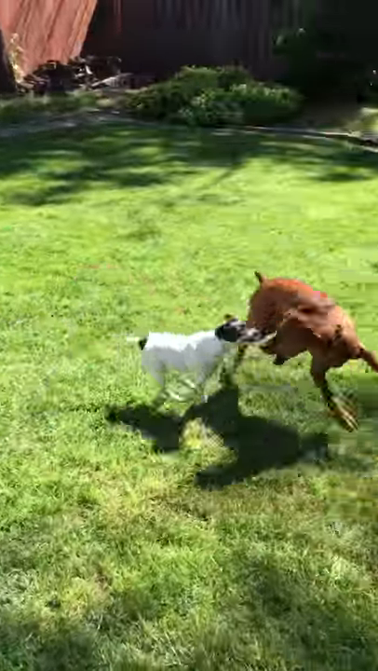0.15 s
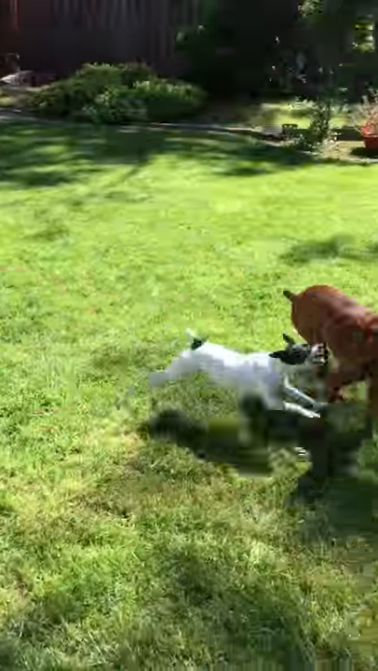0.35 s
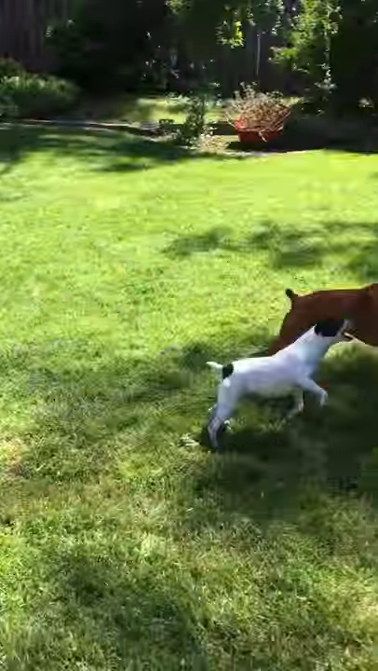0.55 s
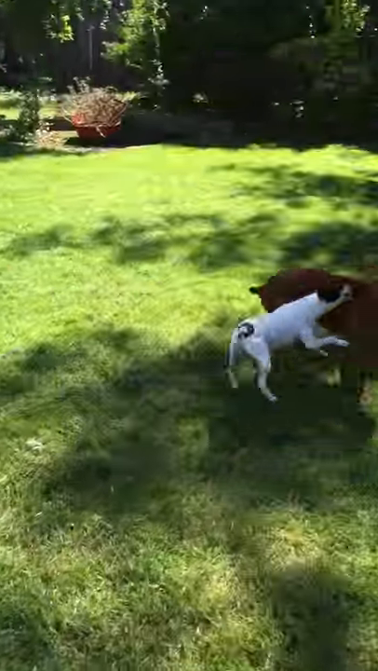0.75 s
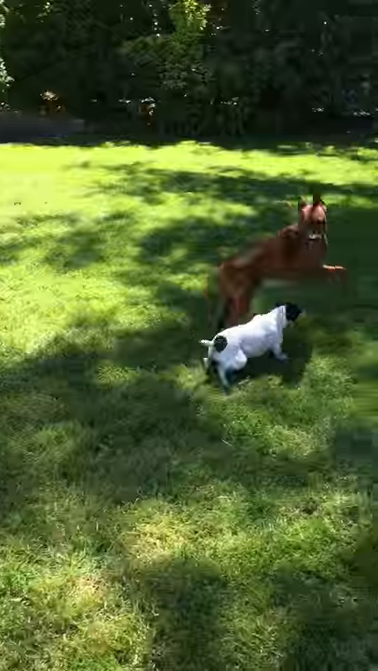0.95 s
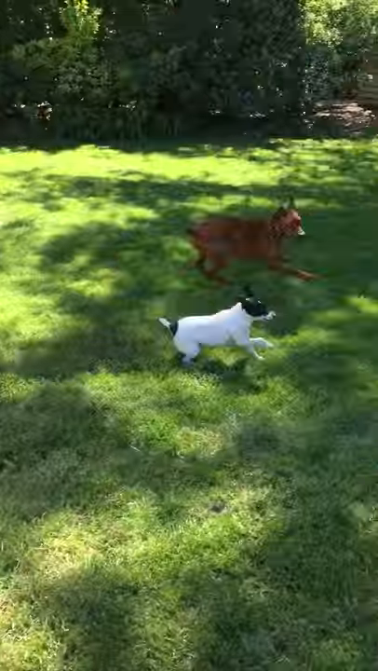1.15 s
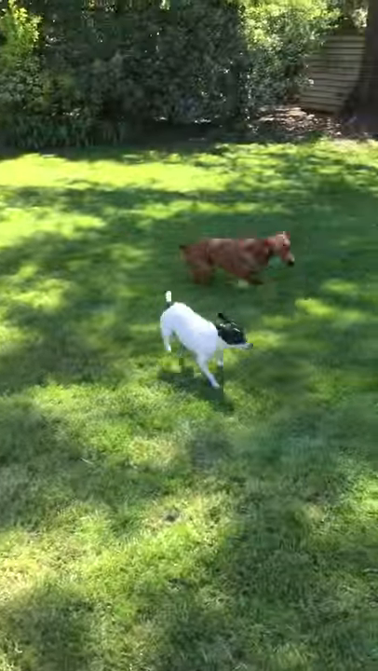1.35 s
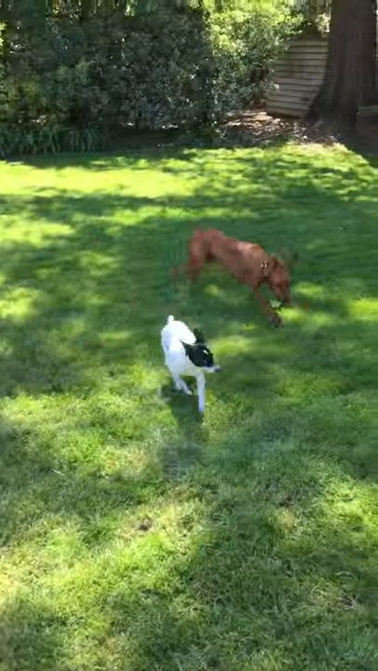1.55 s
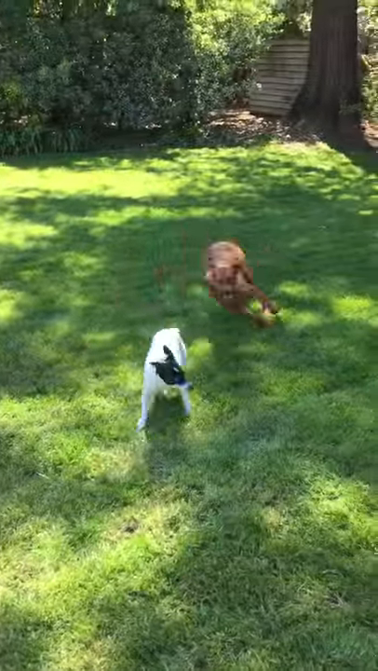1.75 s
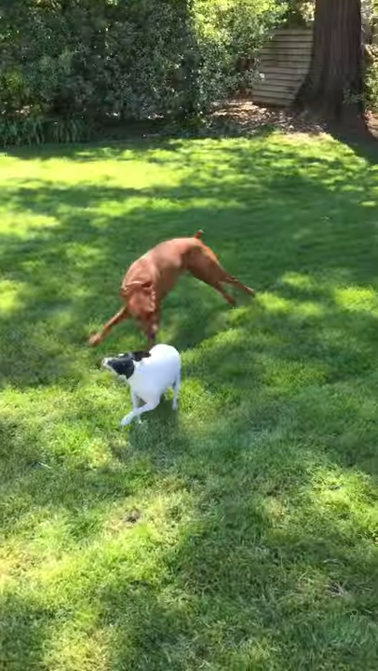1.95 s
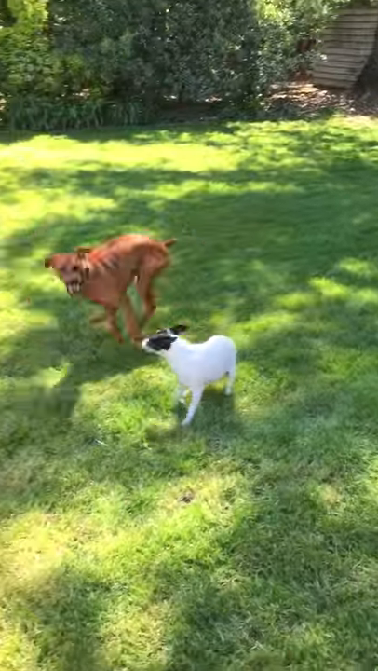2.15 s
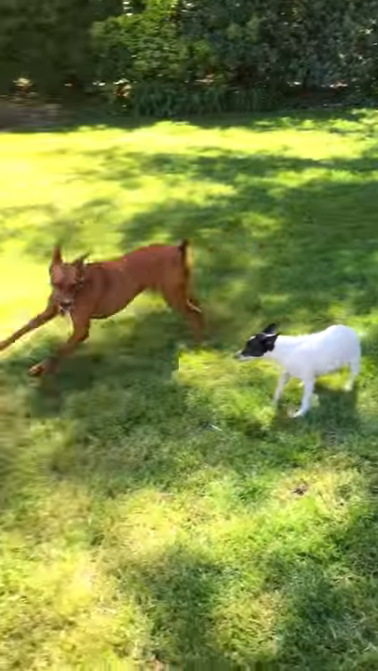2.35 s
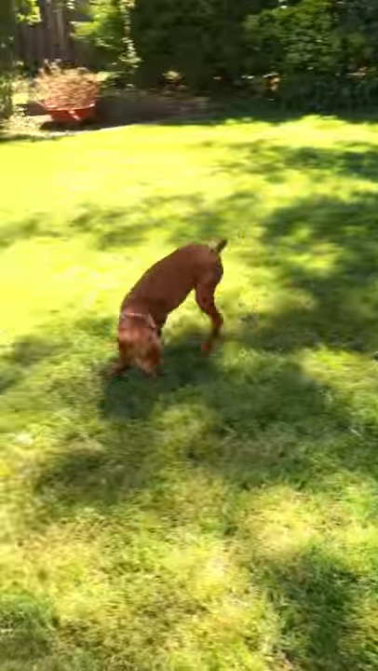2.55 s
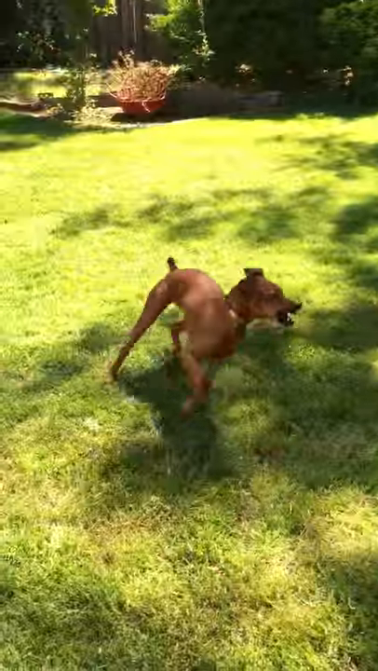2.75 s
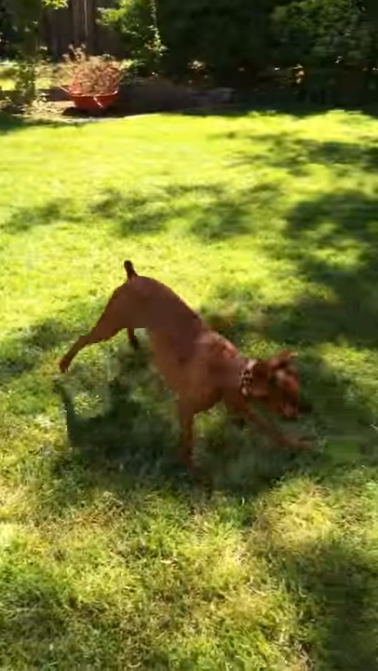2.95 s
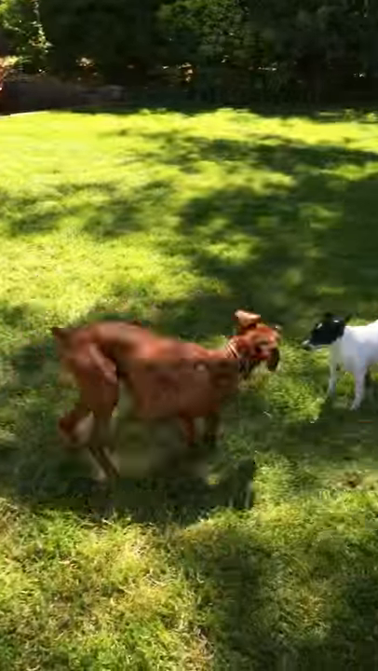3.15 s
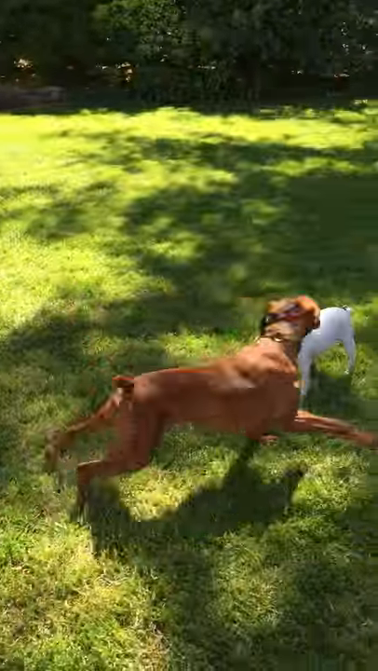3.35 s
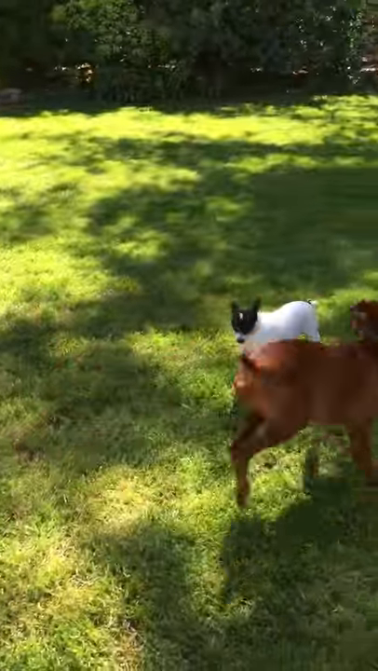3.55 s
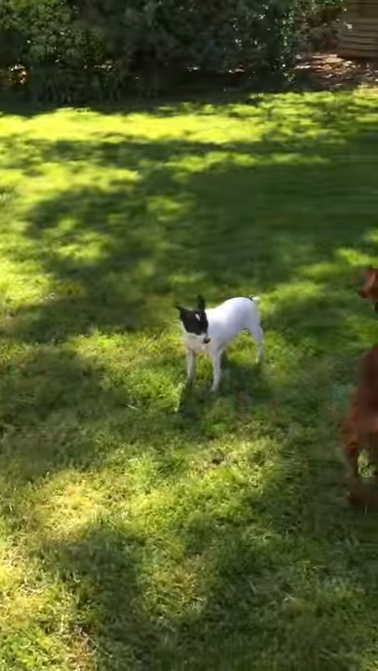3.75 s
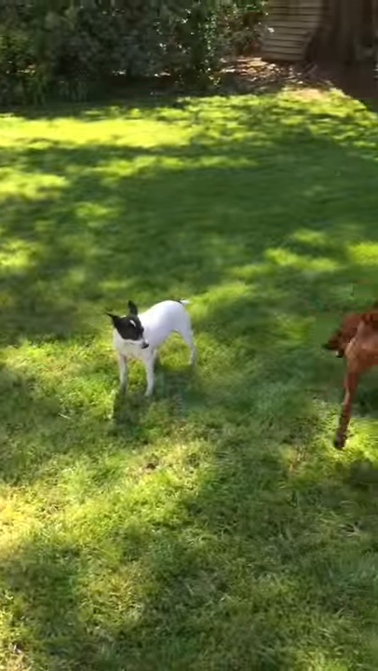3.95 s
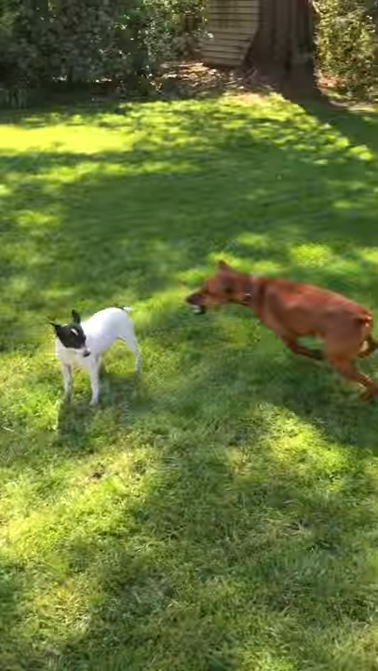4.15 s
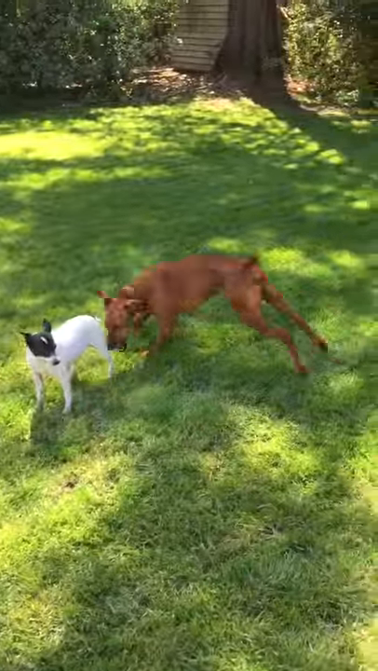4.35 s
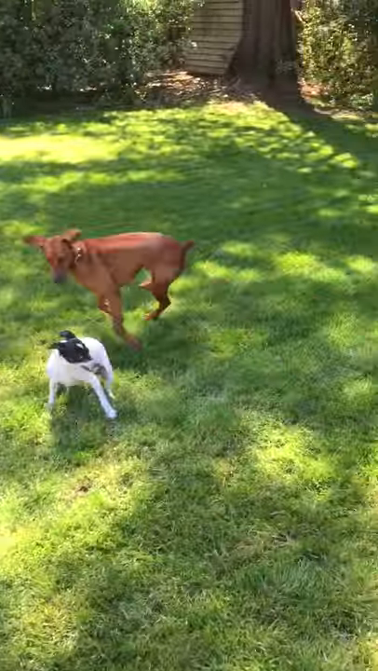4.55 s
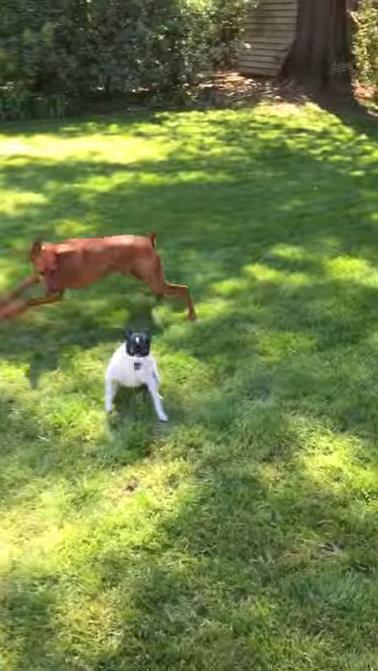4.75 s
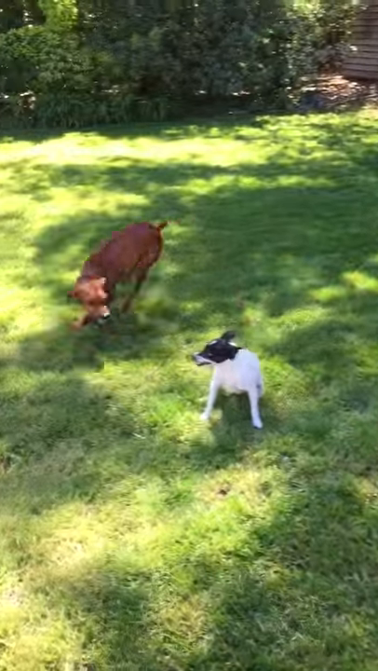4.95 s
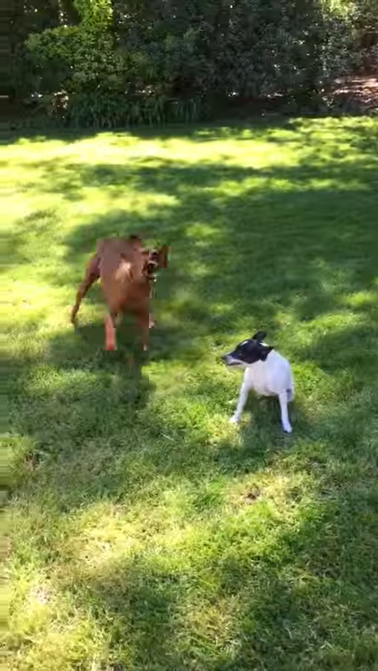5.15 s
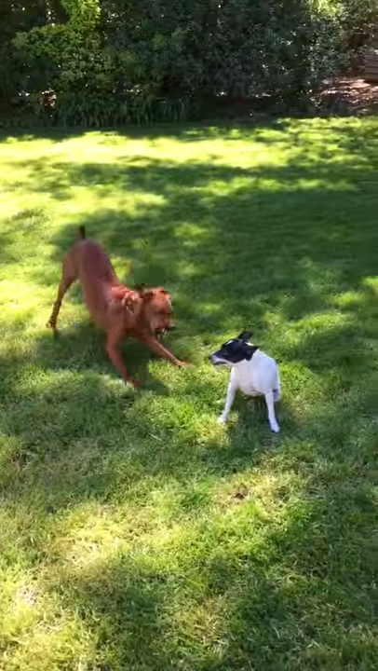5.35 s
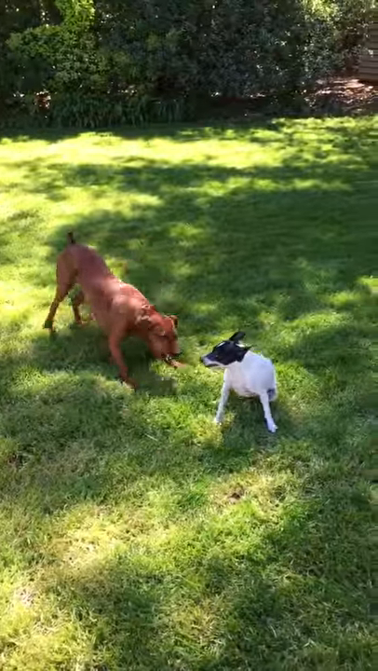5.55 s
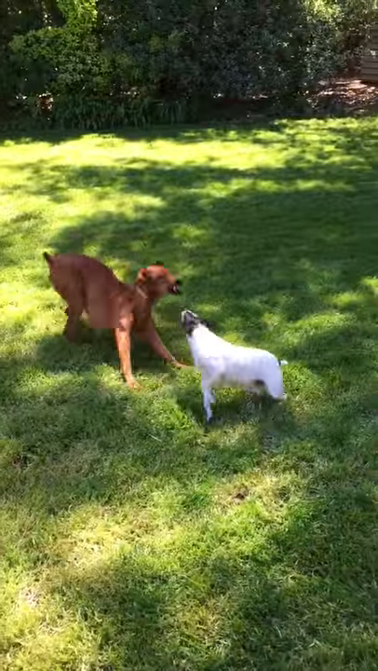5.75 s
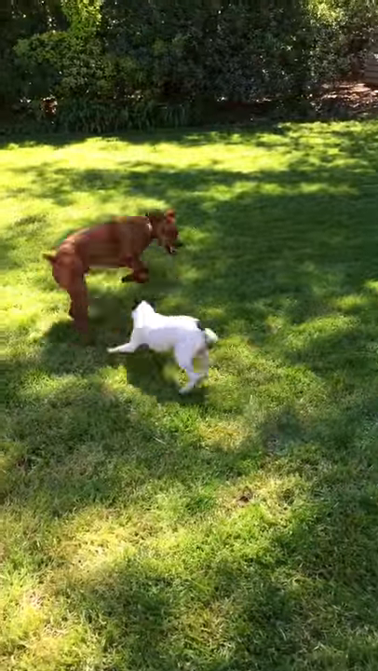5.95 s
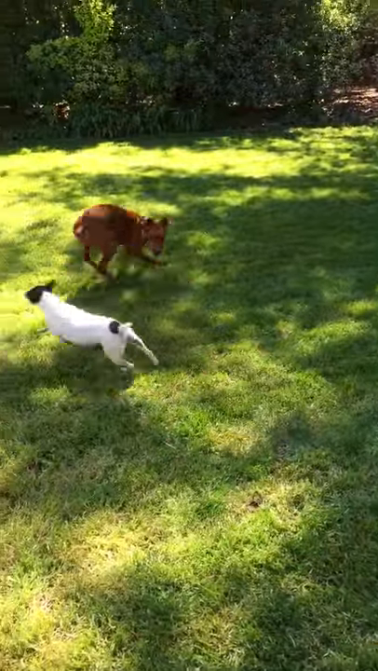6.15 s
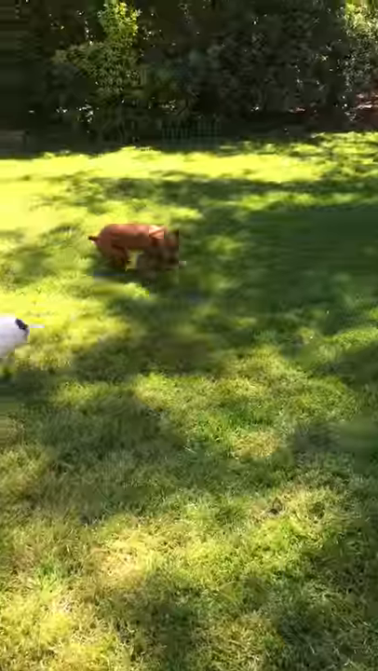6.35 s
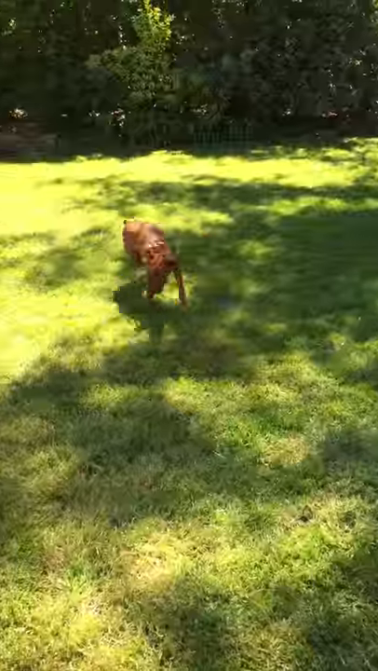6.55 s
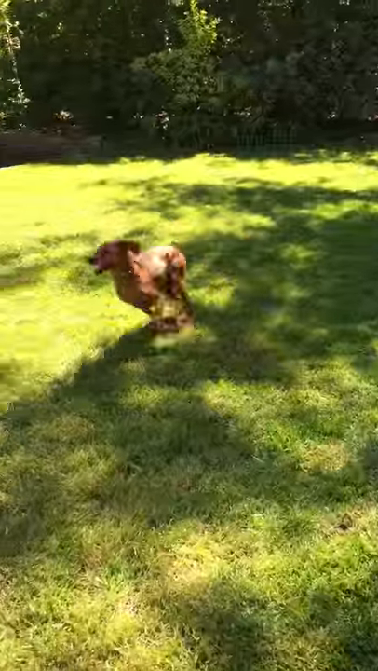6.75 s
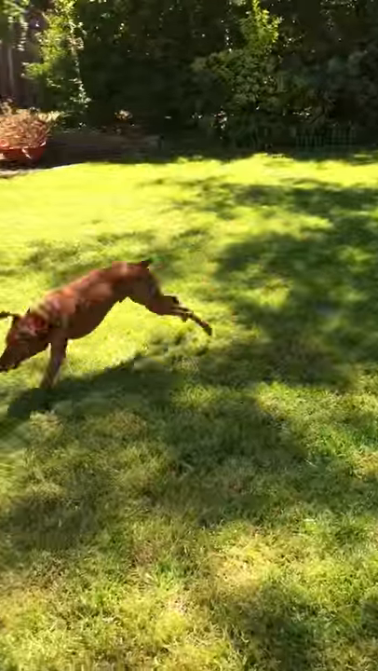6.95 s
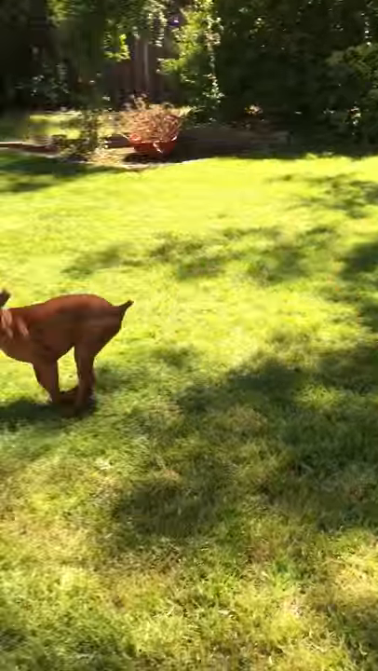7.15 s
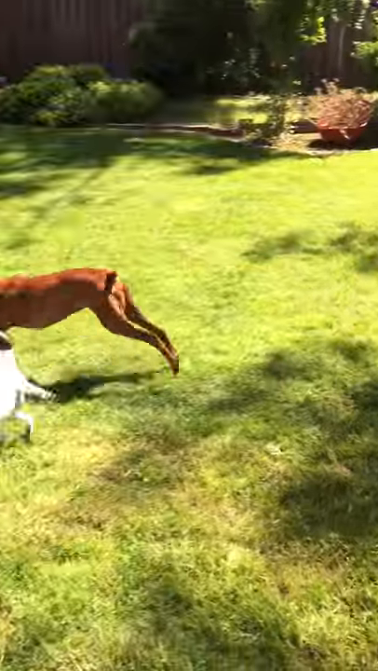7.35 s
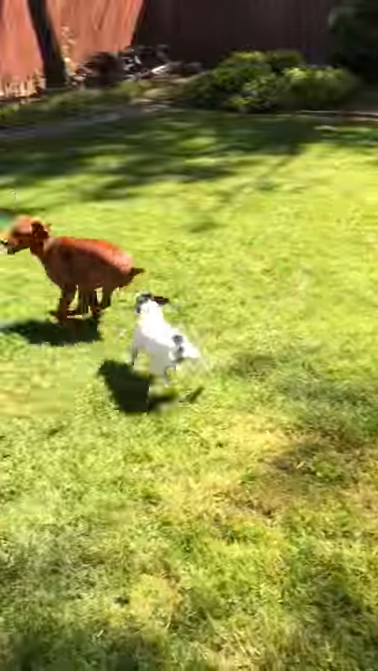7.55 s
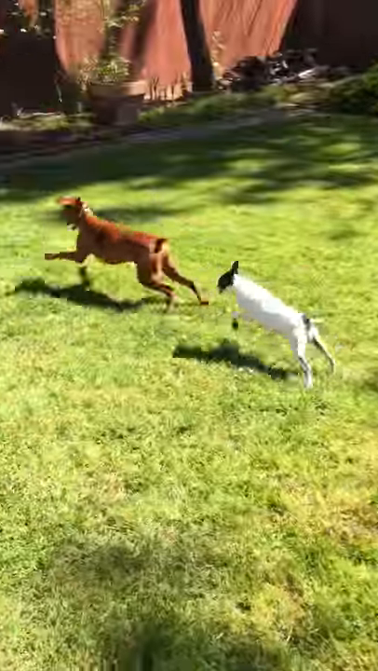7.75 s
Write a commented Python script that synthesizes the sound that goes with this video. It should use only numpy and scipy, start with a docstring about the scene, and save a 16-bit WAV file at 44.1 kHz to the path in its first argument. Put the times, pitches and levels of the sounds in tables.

```python
"""A hoarse growl and snarl open over a low drone of distant traffic, which swells and fades.
Two dogs chase each other over a lawn a few metres away; paws tear at the grass and stalks snap.
One bursts into four loud barks, thrown back by fences and hedges; collar tags clink and wind buffets.
Voices are pulsing folds and noisy breath rung through throat, mouth and teeth; paws are showers of
clicks, as is one rough breath; tags are decaying sines; traffic, air and wind are filtered noise."""
import sys
import numpy as np
from scipy import signal
from scipy.fft import rfft, irfft, next_fast_len
from scipy.io import wavfile

SR = 44100
rng = np.random.default_rng(int(sys.argv[2]) if len(sys.argv) > 2 else 0)


def unload_wav(signal):
    """Save mono or channel-first audio to the path in sys.argv[1] as 16-bit WAV at rate SR, clipped to [-1, 1]."""
    wavfile.write(
        sys.argv[1],
        SR,
        np.round(np.clip(np.atleast_2d(signal).T, -1, 1) * 32767).astype(np.int16),
    )


N = 343980
TIME = np.arange(N) / SR


def amp(db):
    """Decibels to gain."""
    return 10 ** (np.asarray(db) / 20)


def unit(x):
    """Scales to rms 1."""
    return x / np.sqrt(np.mean(abs(x) ** 2) + 1e-20)


def read(points, hz):
    """Reads a table on a log-frequency axis."""
    f, value = np.transpose(points)
    return np.interp(np.log(hz + 1), np.log(f + 1), value)


def add(mix, s, sound):
    """Mixes a sound in at time s."""
    part = mix[max(round(s * SR), 0):][:len(sound)]
    part += sound[:len(part)]


def colour(x, points):
    """Filters by a table of (frequency [Hz], gain [dB])."""
    size = next_fast_len(len(x) + 2048)
    gain = amp(read(points, np.fft.rfftfreq(size, 1 / SR)))
    return irfft(rfft(x, size) * gain, size)[:len(x)]


def wander(count, rate_hz):
    """Smooth random drift of about rms 1, fading out above the rate; repeats after one second."""
    z = rfft(rng.standard_normal(SR))
    smooth = z / (1 + (np.arange(len(z)) / rate_hz) ** 4)
    return np.resize(unit(irfft(smooth, SR)), count)


def resonate(x, hz, width_hz):
    """A moving resonance: shift hz down to zero, smooth twice, shift back."""
    turn = np.exp(2j * np.pi * np.cumsum(hz) / SR)
    r = np.exp(-np.pi * width_hz / SR)
    smooth = signal.lfilter([(1 - r) ** 2], [1, -2 * r, r * r], x / turn)
    return 2 * (turn * smooth).real


def held(x, db, size=700):
    """Makes a sound follow a level curve, with soft ends."""
    window = np.hanning(size)
    power = signal.fftconvolve(x * x, window / window.sum(), "same")
    ends = signal.windows.tukey(len(x), min(2 * size / len(x), 1))
    return amp(db) * ends * x / np.sqrt(abs(power) + 1e-12)


def progress(length):
    """Runs from 0 to 1 over a sound of this length, never under 800 samples."""
    return np.linspace(0, 1, max(round(length * SR), 800))


# distant traffic: (time [s], rumble level [dB], moan level [dB])
TRAFFIC_LEVELS = [(0, -41.5, -57), (1.6, -41.5, -47.5), (2.4, -40.5, -43.5), (3.1, -43.5, -48),
                  (3.798, -41, -42.5), (4.696, -38, -37.5), (5.6, -40, -39.5), (6.199, -38, -36),
                  (6.702, -40.5, -39), (7.101, -38, -46.5), (7.8, -33.5, -40)]
# tone of the engine rumble: (frequency [Hz], gain [dB])
RUMBLE_TONE = [(20, -50), (35, -32), (55, -9.5), (85, -6.5), (120, 0.5), (175, 1.5), (240, -6),
               (400, -28.5), (480, -14), (600, -24), (800, -24), (1500, -34.5), (3000, -44.5),
               (6000, -49.5)]
# tone of the open air: (frequency [Hz], gain [dB])
AIR_TONE = [(100, 0.5), (1000, 10.5), (2000, -8), (4000, -8.5), (9000, -8), (17000, -21.5)]


def background(moan_hz=325, moan_width_hz=120, air_db=-66.5):
    """Far engines rumble and moan over the faint hiss of open air."""
    s, *columns = np.transpose(TRAFFIC_LEVELS)
    rumble_db, moan_db = (np.interp(TIME, s, c) for c in columns)
    low, mid, high = rng.standard_normal((3, N))
    rumble = amp(rumble_db) * unit(colour(low, RUMBLE_TONE))
    moan = resonate(mid, np.full(N, moan_hz), moan_width_hz)
    moan += amp(-11.5) * resonate(mid, np.full(N, 520), 93)
    air = amp(air_db) * unit(colour(high, AIR_TONE))
    return rumble + amp(moan_db) * unit(moan) + air


# wind brushing the microphone: (time [s], level [dB])
WIND_LEVELS = [(0, -67), (6.5, -58), (6.8, -44), (7.15, -43), (7.35, -69), (7.8, -57)]


def wind():
    """Soft low buffeting: bass-heavy noise whose level rises and falls."""
    level_db = np.interp(TIME, *np.transpose(WIND_LEVELS))
    buffeting = colour(rng.standard_normal(N), [(20, -21), (50, -1.5), (90, 2.5), (200, -15), (800, -61)])
    return amp(level_db) * unit(buffeting)


# growls, each one push of the voice:
# (start [s], length [s], top pitch before jitter [Hz], top level before the trim [dB])
GROWL_PUSHES = [(0, 0.17, 152.4, -38.5), (.17, 0.1, 204.4, -32), (.44, 0.066, 156, -36),
                (.505, 0.1, 209.3, -28.5), (.66, 0.092, 171, -31), (.77, 0.073, 177.5, -27.5),
                (.81, 0.12, 216, -28), (1.12, 0.031, 171.4, -33.5), (1.145, .025, 168, -30),
                (1.345, 0.029, 165, -26), (1.385, 0.05, 202, -31), (1.85, 0.11, 179.8, -30.5),
                (3.465, 0.077, 165, -30.5), (4.005, 0.083, 151.5, -28), (4.06, .1, 184.4, -26),
                (4.15, 0.085, 174, -27.5), (4.92, 0.093, 185.3, -29), (5.01, .08, 184.7, -24.5),
                (5.08, 0.097, 185, -29.5), (5.795, 0.052, 180, -21.5), (5.88, 0.039, 170.7, -27),
                (7.235, 0.088, 200.7, -35), (7.35, 0.19, 212.4, -27.5), (7.51, 0.13, 159.7, -33),
                (7.63, 0.065, 198, -36)]
GROWL_SLACK_HZ, GROWL_FADE_DB = 147.7, -8.5  # pitch, and level against the top, at both ends of a push


def growl(start, length, top_hz, db, jitter=0.065, shimmer=0.51, fall_db=-11, trim_db=-1.5):
    """Slack folds flap unevenly behind a nearly shut mouth, mostly at the fundamental, in one push."""
    push = np.sin(np.pi * progress(length))
    hz = GROWL_SLACK_HZ + (top_hz - GROWL_SLACK_HZ) * push
    phase = 2 * np.pi * np.cumsum(hz * (1 + jitter * wander(len(hz), 96))) / SR
    folds = sum(amp(fall_db * np.log2(k)) * np.cos(k * phase) for k in range(1, 6))  # fall per octave
    voice = held(folds, db + trim_db + GROWL_FADE_DB * (1 - push))
    return start, voice * unit(1 + shimmer * wander(len(hz), 45))


# snarls: (start [s], length [s], mouth resonance at first [Hz], at last [Hz], lip resonance [Hz],
#  throat, rasp and hiss levels before their trims [dB], swell from start to end [dB]);
# start and length run between the midpoints of attack and release
SNARL_BREATHS = [(0, 0.019, 1420, 1450, 2800, -43, -44, -58, -19),
                 (0.144, .13, 1650, 1720, 2780, -42, -52, -59, 7),
                 (0.419, 0.16, 1380, 1250, 2064, -36.5, -37, -53.5, 2.5),
                 (0.571, 0.18, 1600, 1850, 2150, -36, -38, -49, 0),
                 (.76, 0.21, 1400, 1520, 2060, -33.5, -34, -41, 12.5),
                 (0.988, 0.046, 1480, 1510, 2530, -44, -39.5, -49, -12),
                 (1.099, 0.18, 1540, 1560, 2470, -42, -50.5, -64.5, -6),
                 (1.339, 0.1, 1360, 1460, 3160, -45, -37, -48, 8),
                 (1.446, 0.082, 1460, 1480, 2460, -58, -45, -62, 1),
                 (1.663, 0.04, 1700, 1715, 2770, -48, -48, -59, 22),
                 (1.82, 0.18, 1650, 1600, 2650, -41, -38.5, -48, 23),
                 (2.09, .14, 1520, 1300, 1970, -44.5, -36.5, -55, -4.5),
                 (2.343, 0.066, 1390, 1390, 2200, -49, -44.5, -57.5, 0.5),
                 (3.336, 0.16, 1520, 1270, 2410, -33, -37.5, -65, 10),
                 (3.495, .17, 1520, 1430, 2380, -45.5, -42.5, -85, -11.5),
                 (4.02, 0.16, 2030, 2250, 2880, -52, -44.5, -60.5, -3.5),
                 (4.111, .11, 1750, 1420, 2770, -48.5, -46.5, -58.5, 0),
                 (4.411, 0.086, 1850, 1850, 2320, -56, -38.5, -55, 7.5),
                 (4.899, 0.12, 1180, 1250, 2000, -40, -43, -57.5, 1),
                 (4.96, 0.12, 1775, 2150, 2910, -32, -36, -46.5, -0.5),
                 (5.069, 0.16, 1890, 1310, 2310, -32.5, -39.5, -50, 3),
                 (5.786, 0.11, 1280, 1190, 1980, -31, -30, -45, 12),
                 (5.909, .14, 1420, 1600, 2460, -42.5, -41.5, -52.5, -7),
                 (6.781, 0.093, 1470, 1500, 2520, -47, -48, -60.5, -10),
                 (7.211, 0.082, 2380, 1950, 2750, -37, -33, -51, 8),
                 (7.302, 0.15, 1740, 1640, 2430, -41, -38.5, -49.5, 2),
                 (7.389, .13, 1400, 1250, 2250, -36, -33.5, -49.5, 6),
                 (7.519, 0.071, 1800, 1800, 2160, -41, -42.5, -54, 5),
                 (7.584, 0.11, 1290, 1210, 2040, -66, -36.5, -58, -10)]
# tone of the snarling throat: (frequency [Hz], gain [dB])
SNARL_THROAT_TONE = [(140, -20), (250, 6), (340, -8), (480, -3), (640, 1), (780, -6.5), (1000, -5),
                     (1400, -16), (3000, -72)]
# tone of the breath between the teeth: (frequency [Hz], gain [dB])
SNARL_HISS_TONE = [(3000, -18.5), (4700, -16), (5400, 3), (6300, -0.5), (6800, 2), (7400, -9), (8600, -3.5),
                   (10500, -9.5), (12200, -10), (13500, -20), (17000, -14)]
SNARL_ATTACK_S, SNARL_RELEASE_S = .018, .05  # each straddles its end of the snarl
LIP_FOLLOW, WHISTLE_FOLLOW = 0.17, 0.3  # how far the upper resonances move with the mouth's


def snarl(start, length, first_hz, last_hz, lip_hz, throat_db, rasp_db, hiss_db, swell_db,
          flap_hz=85, rattle_db=1.5, mouth_width_hz=240, lip_width_hz=330, lip_db=-3,
          nose_hz=3500, nose_db=-13, wash_db=-10, whistle_hz=5900, whistle_db=-3, high_bands_db=-9,
          throat_trim_db=-3.5, rasp_trim_db=-1.8, hiss_trim_db=-3):
    """Air rattles through the throat, rings in the gliding mouth and lips, and hisses between the teeth."""
    whole = length + (SNARL_ATTACK_S + SNARL_RELEASE_S) / 2
    u = progress(whole)
    count = len(u)
    ramps = np.minimum(u / SNARL_ATTACK_S, (1 - u) / SNARL_RELEASE_S) * whole
    envelope = np.clip(ramps, 0, 1) * amp(swell_db * (u - .5))
    mouth_hz = first_hz * (last_hz / first_hz) ** u
    opening = mouth_hz / mouth_hz.mean()
    # loose tissue slaps at uneven intervals
    flaps = np.cumsum(flap_hz * np.exp(.5 * wander(count, 44))) / SR
    slaps = .6 + np.exp(-(flaps % 1) / .3)
    rattle = unit(slaps * amp(rattle_db * wander(count, 40)))
    # the shaking head bends all ringing resonances together
    jaw = 1 + .028 * wander(count, 14)

    def ring(hz, width_hz):
        """Breath in one resonance."""
        return unit(resonate(rng.standard_normal(count), hz * jaw, width_hz))

    throat = colour(rng.standard_normal(count), SNARL_THROAT_TONE)
    wash = colour(rng.standard_normal(count),
                  [(500, -25), (900, -9.5), (2800, 3.5), (3300, -19), (4200, -18), (5000, -29)])
    rasp = ring(mouth_hz, mouth_width_hz)
    rasp += amp(lip_db) * ring(lip_hz * opening ** LIP_FOLLOW, lip_width_hz)
    rasp += amp(nose_db) * ring(nose_hz, 700) + amp(wash_db) * unit(wash)
    hiss = unit(colour(rng.standard_normal(count), SNARL_HISS_TONE))
    hiss += amp(whistle_db) * ring(whistle_hz * opening ** WHISTLE_FOLLOW, 610)
    for band_hz in (8400, 12000):  # two narrow bands of hiss, each with a slow drift of its own
        hiss += amp(high_bands_db) * ring(band_hz * (1 + .05 * wander(count, 10)), 600)
    voice = rattle * amp(throat_db + throat_trim_db) * unit(throat)
    voice += rattle * amp(rasp_db + rasp_trim_db) * unit(rasp)
    voice += np.sqrt(rattle) * amp(hiss_db + hiss_trim_db) * unit(hiss)  # hiss rattles less
    return start - SNARL_ATTACK_S / 2, envelope * voice


# squeaks of the voice, and one faint distant whistle (at 3.74 s):
# (start [s], length [s], pitch at first [Hz], at last [Hz], level before the trim [dB])
SQUEAK_GLIDES = [(0, 0.057, 286, 273, -37.5), (.06, 0.093, 288, 339, -38.5),
                 (0.126, 0.071, 330.5, 294, -38.5), (.17, 0.061, 323, 410, -42),
                 (.505, 0.048, 830, 930, -36), (.525, 0.039, 1133, 1370, -30),
                 (3.505, 0.031, 1618, 1644, -28), (3.74, 0.26, 1866, 1854, -67),
                 (5.86, 0.052, 1143, 1076, -28), (7.405, 0.064, 1065, 1134, -28.5),
                 (7.47, 0.041, 1250, 1286, -38)]


def squeak(start, length, first_hz, last_hz, db, jitter=.03, shimmer=0.21, overtone_db=-17, trim_db=-2):
    """An unsteady whistle, as from the tight edge of the folds: a short soft-ended glide and its octave."""
    u = progress(length)
    hz = (first_hz + (last_hz - first_hz) * u) * (1 + jitter * wander(len(u), 160))
    phase = 2 * np.pi * np.cumsum(hz) / SR
    whistle = held(np.sin(phase) + amp(overtone_db) * np.sin(2 * phase), db + trim_db)
    return start, whistle * unit(1 + shimmer * wander(len(u), 135))


# the faint swish of running through grass: (start [s], end [s], level [dB])
GRASS_SWISHES = [(0, 1.268, -59.5), (1.546, 1.85, -96), (3.336, 3.622, -64.5), (5.814, 6.146, -63),
                 (6.754, 7.798, -68.5)]


def swish(start, end, db, stride_hz=14, uneven_db=5):
    """Legs brush the grass in uneven strokes."""
    count = len(progress(end - start))
    blades = colour(rng.standard_normal(count), [(1000, 3), (3000, 1), (5000, -14), (9000, -3), (17000, -3)])
    strokes = amp(uneven_db * wander(count, stride_hz)) * signal.windows.tukey(count, .2)
    return start, amp(db) * unit(blades * strokes)


# paws scuffing the grass, and one rough breath after the last bark (at 5.452 s):
# (time of the peak [s], level before the trim [dB], rise to the peak [s], centre of the crunch [Hz])
SCUFFS_AND_BREATH = [(0.092, -51.5, 0.033, 3550), (0.329, -48, 0.028, 3350), (0.379, -50, 0.048, 3700),
                     (0.91, -25, 0.027, 2885), (0.941, -26.5, 0.037, 1980), (1.379, -32, 0.037, 3100),
                     (2.529, -49, 0.043, 9500), (2.59, -30.5, 0.034, 2180), (3.767, -52, 0.023, 6200),
                     (3.864, -48, 0.028, 9030), (5.452, -42, 0.056, 2540), (6.344, -53.5, 0.06, 2400),
                     (6.389, -27, 0.035, 2800), (6.459, -37.5, 0.04, 4180), (6.49, -37.5, 0.024, 4060),
                     (6.576, -53.5, 0.03, 3700), (6.829, -39, 0.033, 1070), (6.951, -43, 0.031, 886),
                     (7.093, -46, 0.032, 1010), (7.126, -40.5, 0.036, 2200), (7.224, -31, 0.023, 3650),
                     (7.269, -35, 0.054, 2200), (7.45, -33.5, 0.042, 3600), (7.604, -33.5, 0.063, 2910),
                     (7.655, -34, 0.029, 2000)]
# tone of tearing grass: (frequency [Hz], gain [dB])
GRASS_TONE = [(290, -32.5), (500, -6), (850, -7), (1450, 0.5), (1910, 1.5), (2090, -1.5), (3030, -3),
              (5220, -8.5), (5710, -11), (9010, -16), (17000, -28.5)]


def scuff(s, db, length, hz, blades_per_s=5000, spread_db=0.0, crunch=0.48, trim_db=-5):
    """A paw rips through many blades, each a tiny click; the rough breath is the same shower of clicks."""
    u = np.arange(round(4 * length * SR)) / (length * SR)
    clicks = rng.standard_normal(len(u)) * (rng.random(len(u)) < blades_per_s / SR)
    clicks *= amp(spread_db * np.minimum(rng.exponential(1, len(u)), 3))
    tearing = unit(colour(clicks, GRASS_TONE))
    tearing += crunch * unit(resonate(clicks, np.full(len(u), hz), 0.28 * hz))
    stroke = u ** 4 * np.exp(4 - 4 * u)  # peaks after one length
    return s - length, amp(db + trim_db) * stroke * unit(tearing)


# blades and twigs snapping: (time [s], level before trim and decay [dB])
STALK_SNAPS = [(0.2038, -31), (0.3864, -39), (0.4787, -31.5), (1.054, -42), (1.1504, -34), (1.2034, -57),
               (1.3412, -33), (1.6965, -44), (1.746, -43), (1.896, -37), (4.6817, -40.5), (4.716, -39.5),
               (4.798, -39), (5.7692, -31), (5.868, -35), (6.954, -35), (7.0, -37)]


def snap(s, db, decay_s=0.0037, trim_db=-7):
    """One dry stalk breaks: a noise crack that dies away at once."""
    t = np.arange(1024) / SR
    crack = colour(rng.standard_normal(len(t)), [(400, 10), (1500, -4.5), (5000, -10), (16000, -10)])
    return s, amp(db + trim_db) * unit(crack) * np.exp(-t / decay_s)


# single pops of the throat and jaws:
# (time [s], level before trim and decay [dB], mouth resonance [Hz])
THROAT_POPS = [(.421, -29, 1730), (0.46, -25, 1390), (1.099, -29, 1515), (1.122, -25.5, 1520),
               (1.15, -30, 1570), (1.205, -41, 1570), (1.235, -39, 1610), (1.345, -39, 1400),
               (1.364, -22, 1340), (3.334, -37.5, 1550), (3.45, -16.5, 1250), (4.679, -30.5, 1406),
               (5.788, -26, 1300), (6.78, -43, 1490), (7.216, -23, 2310)]


def pop(s, db, hz, decay_s=0.0076, trim_db=-7):
    """One slap of wet tissue rings the throat, mouth and lips."""
    t = TIME[:2048]
    puff = rng.standard_normal(len(t))
    voice = np.zeros(len(t))
    for ratio, mode_db in [(.43, -14), (1, 4), (1.6, -9.5), (2.2, -16)]:  # against the mouth resonance
        voice += amp(mode_db) * unit(resonate(puff, np.full(len(t), ratio * hz), 316))
    return s, amp(db + trim_db) * unit(voice) * np.exp(-t / decay_s)


# barks, each an arch of pitch; the first turns clearer midway, the others break into roughness:
# (start [s], rise [s], fall [s], time to the turn [s], top pitch before jitter [Hz],
#  roughness before the turn [0-1], after it [0-1], mouth resonance at first [Hz], at last [Hz],
#  throat, mouth and teeth levels after the turn, before fading [dB], their three jumps at the turn [dB],
#  level at the onset against the top [dB])
BARK_ARCHES = [(1.906, .133, .074, 0.12, 401, 0.26, .1, 1450, 1304, -22.5, -18, -26, 1, 0.5, -0.5, -29.5),
               (2.582, .13, 0.064, 0.097, 516.2, 0.34, 0.39, 1717, 1058, -20, -6.5, -15.5, -6, 12.5, -5, -38.5),
               (4.185, .141, .103, 0.1016, 507.7, 0.11, 0.5, 1380, 1125, -23, -9.5, -20, -2, -3.5, -2, -38.5),
               (5.148, .122, .106, 0.075, 508.8, 0.17, 0.63, 1573, 1212, -15.5, -9, -15.5, 9, 7, 3.5, -13.5)]
# tone of the barking throat: (frequency [Hz], gain [dB])
BARK_THROAT_TONE = [(100, -27.5), (180, 2), (300, -5.5), (500, -5), (620, -6.5), (800, -11), (1100, -29),
                    (2000, -72)]
# tone of the bark past the teeth: (frequency [Hz], gain [dB])
BARK_TEETH_TONE = [(1000, -63), (1600, -2.5), (1950, 10), (2200, 3), (2450, -1.5), (2850, -3), (3500, -19),
                   (4300, -22.5), (5100, -28.5), (6300, -20.5), (8500, -26), (10400, -30.5), (12000, -30.5),
                   (17000, -43)]
# pitch of the slack folds; the arch of effort is a sine to these powers
SLACK_HZ, RISE_SHAPE, FALL_SHAPE = 174.2, 1.15, 1.3
TURN_S = .012  # how long the voice takes to turn clearer or rougher
# level as the effort dies, against the top of the arch; the teeth fade less than the mouth
THROAT_FADE_DB, MOUTH_FADE_DB, TEETH_FADE_SHARE = -14.5, -43, 0.84


def bark(start, rise, fall, until_turn, top_hz, rough_before, rough_after, first_hz, last_hz,
         throat_db, mouth_db, teeth_db, throat_jump_db, mouth_jump_db, teeth_jump_db, onset_db,
         smear_growth=0.54, breath=2.6, mouth_width_hz=400, lip_ratio=1.55, lip_gain=0.24, lip_width_hz=600):
    """Effort arches pitch and level while the jaws close; strain smears harmonics and lets air puff through."""
    u = progress(rise + fall)
    count = len(u)
    elapsed = u * (rise + fall)
    from_top = elapsed - rise
    rising = from_top < 0
    arch = abs(np.cos(np.pi / 2 * from_top / np.where(rising, rise, fall)))
    effort = arch ** np.where(rising, RISE_SHAPE, FALL_SHAPE)
    hz = SLACK_HZ + (top_hz - SLACK_HZ) * effort
    mouth_hz = first_hz + (last_hz - first_hz) * u
    before = np.clip(.5 + (until_turn - elapsed) / TURN_S, 0, 1)  # 1 until the voice turns, then 0
    rough = np.clip(rough_after + (rough_before - rough_after) * before, 0, 1)
    slack = (1 - effort) ** 2
    fade_db = slack * np.where(rising, onset_db, MOUTH_FADE_DB)
    phase = 2 * np.pi * np.cumsum(hz * (1 + .035 * rough * wander(count, 150))) / SR

    # strong and weak cycles put sidebands on the overtones
    uneven = .7 * rough * wander(count, 240)
    folds = np.zeros(count)
    for k in range(1, 13):
        chaos = np.clip(rough * (k / 4) ** smear_growth, 0, 1)  # high harmonics break up first
        flutter = unit(wander(count, 55) + 1j * wander(count, 55))
        smear = np.sqrt(1 - chaos) + np.sqrt(chaos) * flutter
        folds += (np.exp(1j * k * phase) * smear).real * (1 + uneven * min(k - 1, 2))
    # above about 440 Hz the folds double their period: half lines appear between the overtones
    doubling = np.clip((hz - 440) / 55, 0, 1) * np.minimum(3 * rough, 1)
    half_lines = sum(np.cos(k * phase) * unit(1 + .5 * wander(count, 60)) for k in np.arange(2.5, 7))
    folds += doubling * half_lines

    air = unit((1 + .8 * np.cos(phase)) * rng.standard_normal(count))  # puffs once per cycle
    # the roar comes only under strain
    roar = rough ** 2 * colour(air, [(300, -32), (450, 11), (700, 13.5), (1200, -8), (3000, 0.5)])
    hiss = colour(air, [(1500, -31.5), (2500, -28), (4000, -4), (6500, 2.5)])
    rasp = np.sqrt(rough) * colour(air, [(900, -20), (1500, 0), (2100, 9), (3300, 9), (5000, -5)])
    drive = unit(folds) + breath * roar + rasp + hiss

    throat_level_db = throat_db + THROAT_FADE_DB * slack - throat_jump_db * before
    throat = held(colour(drive, BARK_THROAT_TONE), throat_level_db)
    mouth = resonate(drive, mouth_hz, mouth_width_hz)
    mouth += 0.3 * rough * colour(drive, [(400, -35), (750, -5), (1100, 11.5), (2000, -27.5)])
    mouth = colour(mouth, [(400, -14), (750, -3.5), (1000, 0.5), (1180, 1), (1650, 0), (2400, -2), (5000, -34.5)])
    mouth = held(mouth, mouth_db + fade_db - mouth_jump_db * before)
    lips = resonate(drive, lip_ratio * mouth_hz, lip_width_hz)  # sinks as the jaws close
    teeth_level_db = teeth_db + TEETH_FADE_SHARE * fade_db - teeth_jump_db * before
    teeth = held(colour(drive + lip_gain * lips, BARK_TEETH_TONE), teeth_level_db)
    return start, throat + mouth + teeth


# collar tags clinking: (time [s], pitch [Hz], peak level [dB])
TAG_CLINKS = [(4.682, 5160, -57.5), (4.885, 7100, -61)]


def tag(s, hz, db, t60=.13):
    """A small metal disc rings briefly, falling 60 dB in t60 seconds."""
    t = TIME[:SR // 4]
    return s, amp(db - 60 * t / t60) * np.sin(2 * np.pi * hz * t)


# how long the yard's scatter takes to fall 60 dB: (frequency [Hz], decay [s])
YARD_DECAY = [(150, 0.51), (500, 0.45), (1300, 0.69), (2500, 0.93), (5000, 0.19), (12000, 0.44)]
# echoes off ground and fences: (delay [s], level before colouring [dB])
YARD_ECHOES = [(.0012, -35.5), (0.026, -26), (.056, -30.5), (.083, -44.5), (0.123, -32.5)]


def yard(x, tail_db=-24):
    """A few hard echoes, then a thin scatter from hedges and houses."""
    taps = rng.standard_normal(SR) * (rng.random(SR) < 900 / SR)  # about 900 reflections per second
    taps *= amp(1.7 * wander(SR, 25)) * np.minimum(TIME[:SR] / 0.02, 1)
    hz, t, z = signal.stft(taps, SR, nperseg=256)
    decay = amp(-60 * t / read(YARD_DECAY, hz)[:, None])
    tail = signal.istft(z * decay, SR, nperseg=256)[1]
    response = amp(tail_db) * tail / np.linalg.norm(tail)
    for delay, db in YARD_ECHOES:
        add(response, delay, amp([db]))
    response = colour(response, [(200, 11.5), (2000, -4.5), (5000, 9), (15000, -2.5)])
    return x + signal.fftconvolve(x, response)[:N]


def scene():
    """Voices, paws and the faint whistle in the yard, over traffic, air and wind."""
    events = np.zeros(N)
    layers = [(growl, GROWL_PUSHES), (snarl, SNARL_BREATHS), (squeak, SQUEAK_GLIDES),
              (swish, GRASS_SWISHES), (scuff, SCUFFS_AND_BREATH), (snap, STALK_SNAPS),
              (pop, THROAT_POPS), (bark, BARK_ARCHES), (tag, TAG_CLINKS)]
    for source, table in layers:
        for row in table:
            add(events, *source(*row))
    return (yard(events) + background() + wind())[None]


EDGE_HZ = 17200  # upper limit of the band


def record(dry):
    """The loudest peaks are rounded off at full scale; then the treble is cut above the band edge."""
    limited = dry / (1 + dry ** 8) ** (1 / 8)
    lowpass = signal.firwin(511, EDGE_HZ, window=("kaiser", 9), fs=SR)
    return signal.oaconvolve(limited, lowpass[None], "same")


dry = scene()
out = record(dry)
unload_wav(out)
```